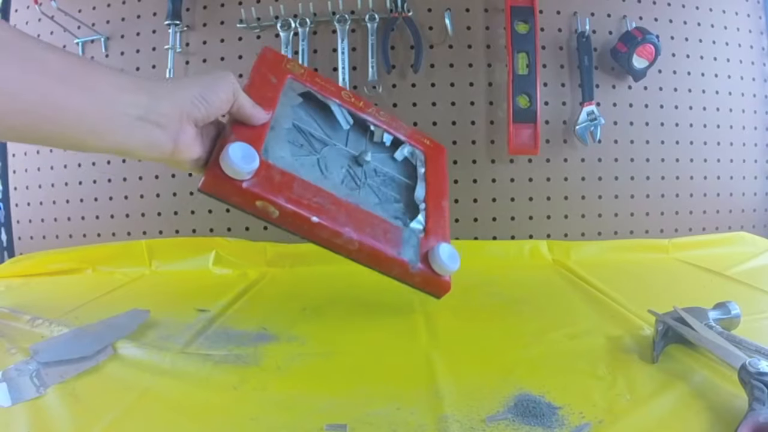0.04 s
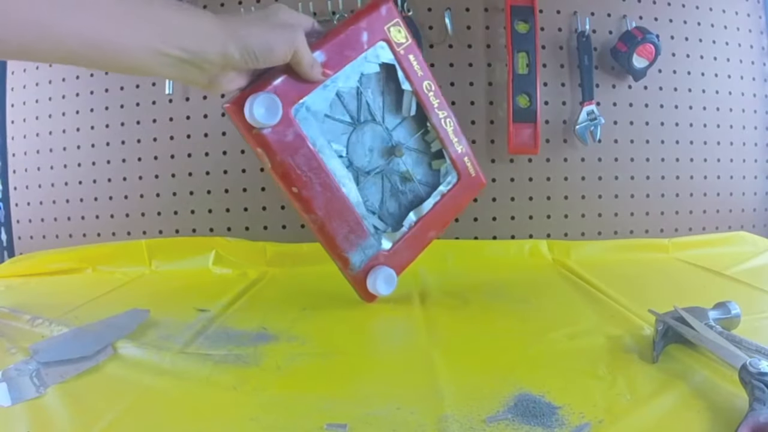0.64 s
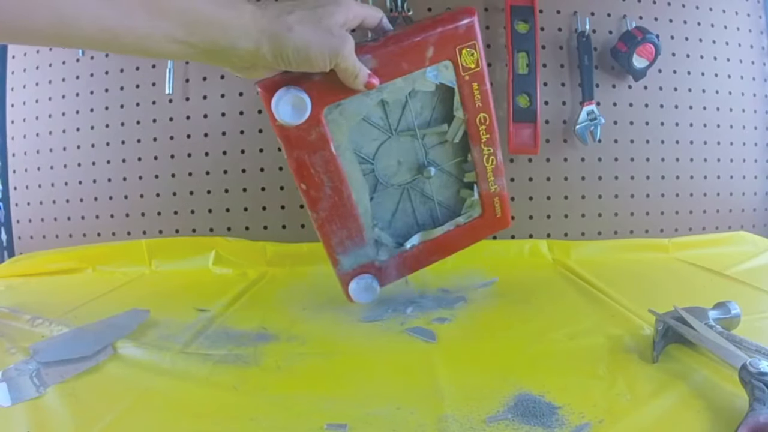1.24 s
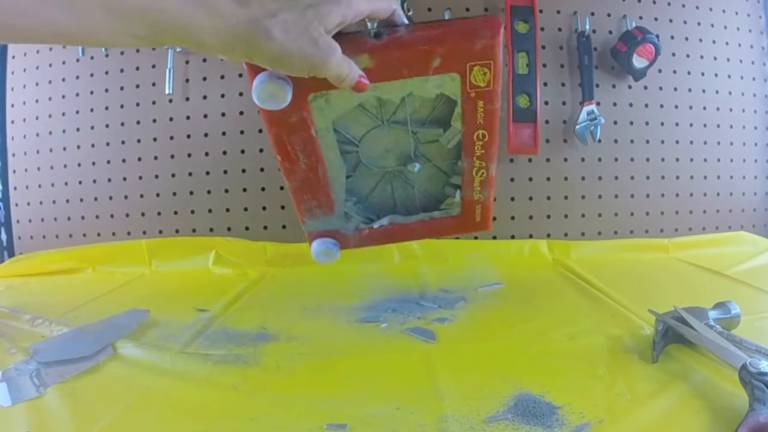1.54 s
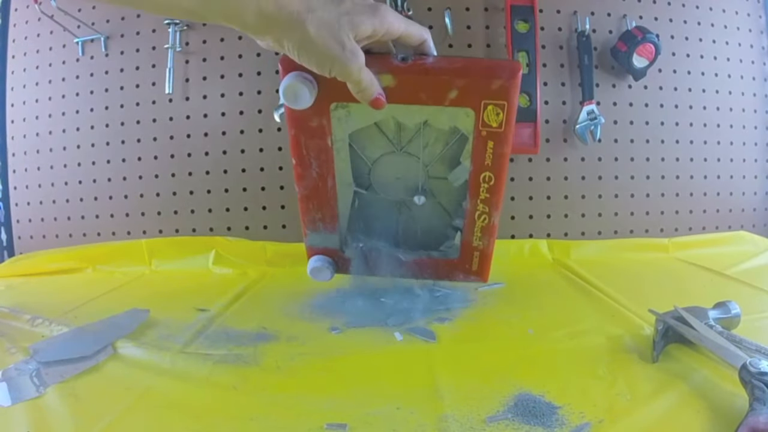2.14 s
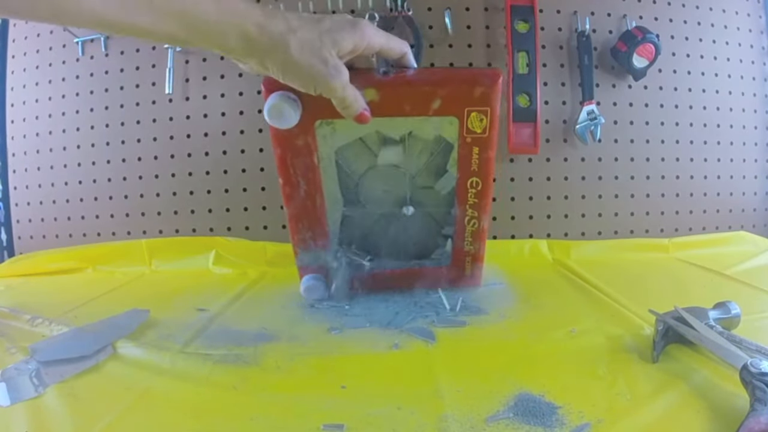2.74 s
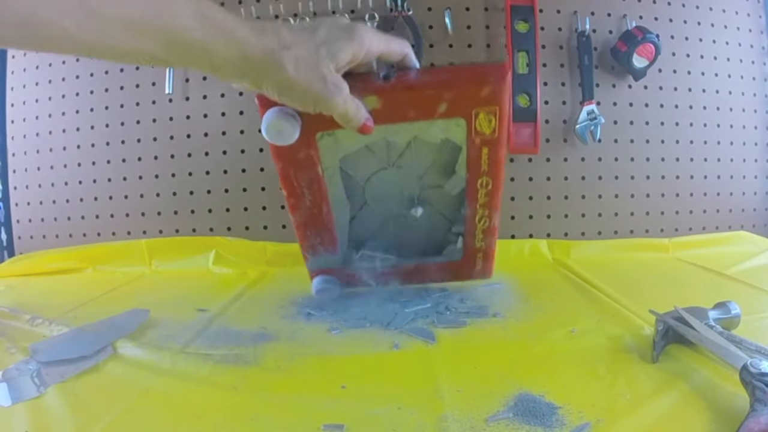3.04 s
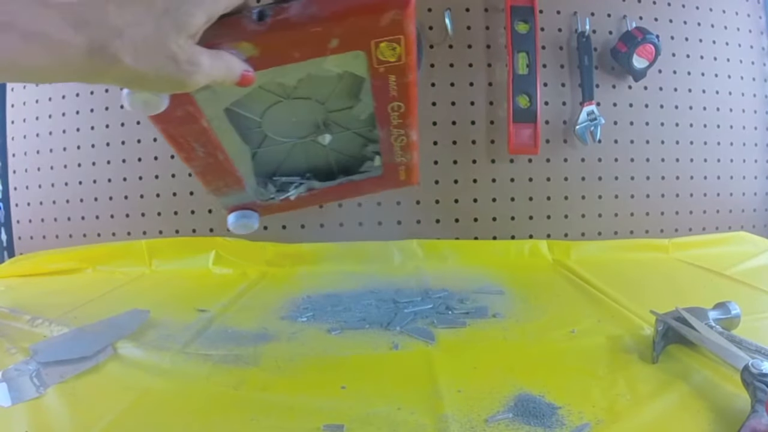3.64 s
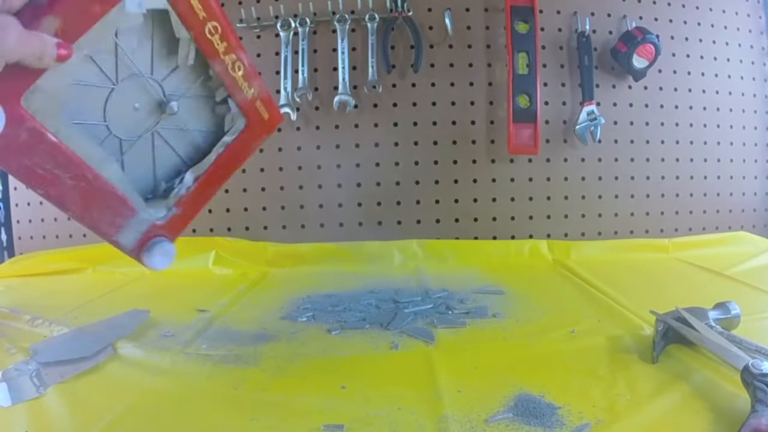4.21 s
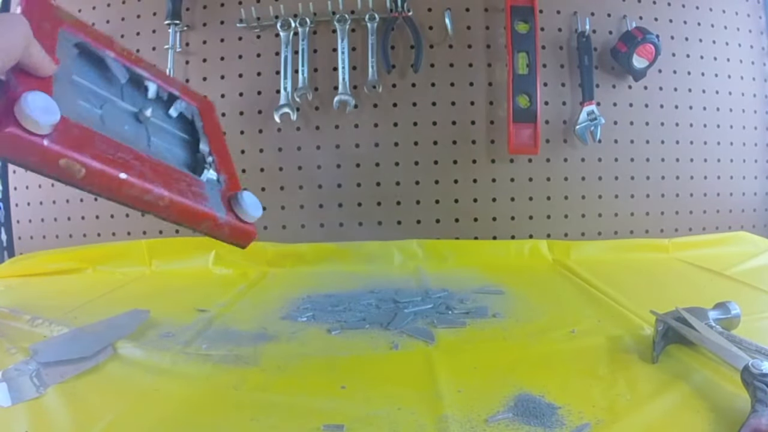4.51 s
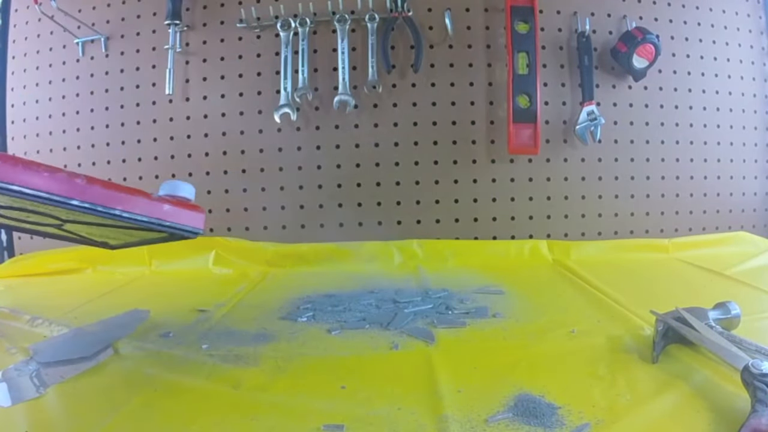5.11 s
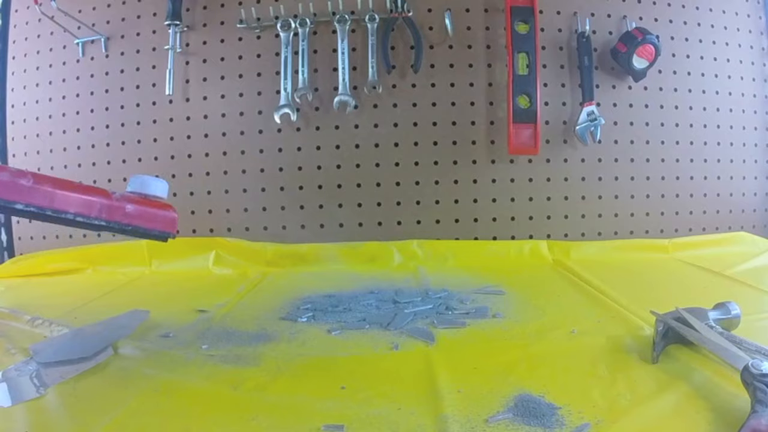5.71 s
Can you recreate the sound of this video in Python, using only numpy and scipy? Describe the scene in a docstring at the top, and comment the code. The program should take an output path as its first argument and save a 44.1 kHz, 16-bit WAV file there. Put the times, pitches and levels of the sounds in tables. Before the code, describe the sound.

Close by in a small, softly humming workshop, a hollow plastic toy thumps against a table, its broken glass rattling inside. Shards and powder spill out in two hissing, clinking pours, with small squeaks of glass edges and a knock starting the second. Two more sharp knocks follow, then things quieten to a faint trickle of grit and a few plastic creaks.

```python
"""Emptying a broken drawing toy

A plastic drawing toy with a smashed glass screen is knocked on a covered work table to empty it.
Each impact excites the modes of table and case. Shards clink by collision, squeak by friction and
slide out in a granular hiss of grit and powder. Stick-slip makes the case creak as it is carried off.
A wall close behind reflects everything in a small, humming workshop."""
import sys
import numpy as np
from scipy import signal
from scipy.fft import rfft, irfft
from scipy.io import wavfile
from scipy.ndimage import uniform_filter1d, map_coordinates

SR = 44100
rng = np.random.default_rng(int(sys.argv[2]) if len(sys.argv) > 2 else 0)


def digitize_waveform(pressure):
    """Quantize a signal to 16-bit integers and store it at the path in sys.argv[1].

    Rows of a 2-D input are taken as channels; values are limited to [-1, 1].
    """
    field = np.atleast_2d(pressure).T
    bounded = np.clip(field, -1, 1)
    quanta = np.round(bounded * 32767).astype(np.int16)
    wavfile.write(sys.argv[1], SR, quanta)


N = 258667
T = np.arange(N) / SR
FREQS = np.fft.rfftfreq(N, 1 / SR)


def undb(db):
    """Amplitude grows tenfold every 20 dB."""
    return 10 ** (np.asarray(db) / 20)


def unit(x):
    """Normalisation to an energy of one."""
    return x / np.sqrt(np.sum(x ** 2) + 1e-18)


def on_log(hz, points):
    """Interpolation of (Hz, value) points along a logarithmic frequency axis."""
    f, value = np.transpose(points)
    return np.interp(np.log(np.maximum(hz, 1)), np.log(f), value)


def colour(points, size=2048):
    """A (Hz, dB) spectrum determines its minimum-phase impulse response."""
    cepstrum = irfft(np.log(undb(on_log(np.fft.rfftfreq(size, 1 / SR), points))))
    cepstrum[1:size // 2] *= 2
    cepstrum[size // 2 + 1:] = 0
    return irfft(np.exp(rfft(cepstrum)))


def through(x, response):
    """A linear system convolves its input with its impulse response."""
    return signal.fftconvolve(x, response)[:len(x)]


def highpass(x, hz):
    """A body radiates poorly at wavelengths much longer than itself."""
    return signal.sosfilt(signal.butter(2, hz, "high", fs=SR, output="sos"), x)


def add(out, start, x):
    """Superposition: x joins out from a start in seconds."""
    i = max(int(start * SR), 0)
    out[i:i + len(x)] += x[:max(N - i, 0)]


def ring(modes, t):
    """Free vibration is a sum of damped (Hz, dB, T60) modes, here of alternating sign."""
    return sum((-1) ** k * undb(db) * np.sin(2 * np.pi * hz * t) * np.exp(-np.log(1000) * t / t60)
               for k, (hz, db, t60) in enumerate(modes))


def shaped_noise(spectrum):
    """Filtered white noise takes on the filter's spectrum; its rms is set to one."""
    return unit(irfft(rfft(rng.standard_normal(N)) * spectrum, N)) * np.sqrt(N)


def wander(seconds):
    """Low-passed noise fluctuates slowly, over the given time scale."""
    return shaped_noise(np.exp(-(FREQS * seconds) ** 2))


# Each row: frequency in Hz, relative level of the room noise in dB.
AIR_SPECTRUM = [(25, -13.5), (50, -7), (100, -13.5), (140, -26.5), (200, -21.5), (330, -23), (410, -29.5),
                (500, -24), (850, -26.5), (2000, -33.5), (5000, -43.5), (16000, -79)]
# Each row: centre of a hum band in Hz, half-width in Hz, rms level in dB.
HUM_BANDS = [(144.2, 23, -48.5), (285, 37, -61.5), (413, 22, -67)]
def room_hum(air_db=-54):
    """Narrow bands of noise are heard as a wavering hum, over soft broadband room noise."""
    air = through(rng.standard_normal(N), unit(colour(AIR_SPECTRUM)))
    hum = sum(undb(db) * shaped_noise(1 / (1 + ((FREQS - hz) / width) ** 2))
              for hz, width, db in HUM_BANDS)
    return undb(air_db) * air + hum


def grains(n, rate, spread_db):
    """Shot noise: random impacts at a rate per second, a few far above the rest; rms near one."""
    chance = rng.random(n)
    excess = np.minimum(rng.exponential(size=n), np.pi)
    sign = rng.choice([-1, 1], n)
    size = undb(spread_db * excess)
    return (chance < rate / SR) * sign * size / np.sqrt(np.mean(size ** 2) * rate / SR)


# Debris pours from the upturned case. Each row: crest in seconds, flow in dB, swell in dB per second,
# time it starts to run dry in seconds, powder in dB relative to the flow.
DEBRIS_POURS = [(1.14, -34, 51, 1.502, -8), (2.19, -32, 96, 2.524, -6.5)]
# Debris shifts in the tilted case. Each row: middle in seconds, flow in dB, half-length in seconds,
# powder in dB relative to the flow.
DEBRIS_SHIFTS = [(0.25, -47, .13, -8), (0.694, -52, 0.52, -13), (1.653, -58, 0.47, -6),
                 (2.021, -45.5, 0.025, -17), (2.694, -59, 0.25, -3.5), (3.111, -49, .13, -7),
                 (3.42, -56, 0.11, -9), (3.922, -60.5, 0.088, -2), (4.147, -57, 0.087, 0.5),
                 (4.69, -57, 0.42, -5), (5.285, -62.5, 0.31, -22)]
def flow(trickle_db=-67.5, thinning_db_per_s=21.5, drying_db_per_s=200, powder_lag_s=0.019):
    """Incoherent sources add in power: trickle, pours and shifts give grit and powder levels in dB."""
    grit, powder = undb(trickle_db) ** 2, undb(trickle_db - 8) ** 2
    for crest, db, swell, runs_dry, powder_db in DEBRIS_POURS:
        pour = undb(db - swell * np.maximum(crest - T, 0)
                    - thinning_db_per_s * np.maximum(T - crest, 0)
                    - drying_db_per_s * np.maximum(T - runs_dry, 0))
        grit += pour ** 2
        powder += (undb(powder_db) * np.interp(T - powder_lag_s, T, pour)) ** 2
    for middle, db, half_length, powder_db in DEBRIS_SHIFTS:
        shift = undb(db) * np.exp(-((T - middle) / half_length) ** 2)
        grit += shift ** 2
        powder += (undb(powder_db) * shift) ** 2
    return 10 * np.log10(grit), 10 * np.log10(powder)


# Spectra of sliding grit and powder. Each row: frequency in Hz, relative level in dB.
GRIT_SPECTRUM = [(200, 5), (650, 3.5), (1100, 5), (1900, 3.5), (3000, 2), (4800, 1.5), (6300, 0),
                 (8000, -9), (16000, -20)]
POWDER_SPECTRUM = [(2000, -37), (6000, -25), (8000, 2.5), (10000, 1.5), (12000, -3.5), (16000, -2.5)]
def debris():
    """Granular flow: a strong stream tumbles as separate grains, a weak one blurs into a hiss."""
    flow_db, powder_db = flow()
    graininess = np.interp(flow_db, [-60, -45], [.45, .92])
    tumble = graininess * grains(N, rate=1100 * undb(.3 * (flow_db + 35)), spread_db=5.5)
    hiss_share = np.sqrt(1 - graininess ** 2)
    grit, powder = (through(tumble + hiss_share * rng.standard_normal(N), unit(colour(spectrum)))
                    for spectrum in (GRIT_SPECTRUM, POWDER_SPECTRUM))
    surge = undb(2.5 * wander(seconds=0.023))  # the stream sticks and slips
    return surge * (undb(flow_db - 1) * grit + undb(powder_db - 2) * powder)


def slot(x, resonance_hz=1120, drift=.13, reflection=0.29):
    """Comb filtering: reflections in the exit gap give resonances that glide as the case tilts."""
    lag = SR / resonance_hz * np.exp(drift * wander(seconds=.06))
    passes = sum(reflection ** k * map_coordinates(x, [np.arange(N) - k * lag], order=3)
                 for k in range(3))
    return passes / np.hypot(1, reflection)


def landing(t, rise_s, rate=20000):
    """Multiple contact: a jagged edge beds into the pile in a quick swell of tiny impacts."""
    return unit(grains(len(t), rate, spread_db=9.2) * t * np.exp(-t / rise_s))


def shard(t, t60=0.0088, count=22):
    """An irregular glass plate has scattered, inharmonic modes, damped by the pile."""
    pitch, size, life = rng.random((count, 3)).T
    hz = 1700 * np.minimum(8.5 ** pitch, 11)
    return unit(ring(zip(hz, -10 * size, t60 * (.5 + life)), t))


def stray_shards(per_second=18):
    """Random collisions: small shards tick with a strength that follows the flow carrying them."""
    out, t, flow_db = np.zeros(N), T[:SR // 20], flow()[0]
    for place, size in rng.random((int(per_second * T[-1]), 2)):
        i = int(place * N)
        contacts = landing(t, rise_s=0.0015, rate=4000)
        tick = unit(contacts + 0.25 * through(contacts, shard(t)))
        add(out, T[i], undb(flow_db[i] + 14.5 + 10 * size) * tick)
    return through(out, unit(colour([(500, -19), (2000, -10), (5200, -4), (8000, 4), (15000, -12.5)])))


def chatter(t, decay_s, rate):
    """Dissipation: a run of tiny contacts dies away exponentially."""
    return unit(grains(len(t), rate, spread_db=2.4) * np.exp(-t / decay_s))


def contact_pulse(u):
    """A struck table top radiates the rate of change of force; u is time over contact time."""
    return -u / (1 + (u / 2) ** 2) ** 3


# Modes of the table top, the plastic case and the room's low ring.
# Each row: frequency in Hz, relative level in dB, time to decay by 60 dB (T60) in seconds.
TABLE_RESONANCES = [(155.4, 1, 0.18), (178, 9, 0.066), (214, -1, 0.18), (255, -4, 0.18), (347, -1.5, 0.18),
                    (393, -4, 0.13), (562, -8, 0.16), (574, -28.5, .1), (645, -11.5, 0.2), (759, -11, 0.15),
                    (940, -31, 0.11), (1088, -13.5, 0.15), (1320, -8.5, 0.073)]
CASE_RESONANCES = [(245, -4.5, 0.25), (512, -0.5, 0.059), (589, 6.5, 0.029), (704.5, 0, 0.083),
                   (826, -8.5, 0.077), (996, -18, 0.046), (1223, -8, 0.058)]
ROOM_RESONANCES = [(149.6, 2, 0.37), (449, -2.5, 0.24)]
# Each row: frequency in Hz, gain on crack and rattle in dB.
CRACK_SPECTRUM = [(300, 20.5), (900, 7.5), (1800, 7), (3500, 3.5), (5000, 1), (7500, -6), (11000, -9.5),
                  (16000, -18)]
# The case strikes the table. Each row: start in seconds, thump gain in dB, contact time in ms,
# rebound interval in ms, then gains in dB for case ring, crack, crack treble and rattle.
CASE_KNOCKS = [(0.0512, -15.5, 0.66, 5.7, -17, -7, -5.5, -30), (0.3608, -7, 0.63, 5.6, -5, 4.5, -6.5, -4.5),
               (0.5558, -8, 0.66, 4.5, -6, 2.5, -4.5, -11), (2.0983, -10.5, 0.42, 3.4, 4, -4, -1.5, -7.5),
               (2.9271, -8, 0.7, 6.7, -20, 8.5, 2.5, -9), (3.3217, -8.5, 0.85, 4.2, -15, 2, -1, -9)]
def knocks(restitution=0.54, detune=0.0092, hollow_hz=270.4, sag=0.3475, sag_s=0.0806):
    """Impact excites modes: the table thumps, the rebounding case rings and cracks, glass rattles."""
    out, t, lead_s = np.zeros(N), T[:SR // 2], .004
    case = unit(ring(CASE_RESONANCES, t) * (1 - np.exp(-t / 0.00014)))
    standing_waves = unit(ring(ROOM_RESONANCES, t) * (1 - np.exp(-t / 0.0086)))
    # a lingering hollow note starts sharp and sinks to its pitch
    sagging_time = t + sag * sag_s * (1 - np.exp(-t / sag_s))
    hollow = unit(ring([(hollow_hz, 0, 0.66)], sagging_time) * (1 - np.exp(-t / 0.021)))
    for start, thump_db, contact_ms, rebound_ms, case_db, crack_db, treble_db, rattle_db in CASE_KNOCKS:
        u = (t - lead_s) * 1000 / contact_ms
        slap = sum(restitution ** k * contact_pulse(u - k * rebound_ms / contact_ms) for k in range(4))
        add(out, start - lead_s, undb(thump_db) * 2.78 * slap)
        # each blow falls on another spot and loads the table differently
        chance = rng.uniform(-0.57, 1, (len(TABLE_RESONANCES), 2))
        modes = [(hz * (1 + detune * load), db + 2 * spot, t60)
                 for (hz, db, t60), (load, spot) in zip(TABLE_RESONANCES, chance)]
        thump = unit(ring(modes, t)) - 0.25 * standing_waves + 0.33 * hollow
        add(out, start, undb(thump_db) * 9.2 * thump + undb(case_db) * 4.4 * case)
        snap = landing(t, rise_s=0.00019) + 1.33 * chatter(t, decay_s=0.012, rate=5000)
        crack = undb(crack_db) * unit(snap + 0.079 * shard(t))
        add(crack, rebound_ms / 1000, undb(crack_db - 2.5) * landing(t[:SR // 50], rise_s=.0004))
        crack = highpass(through(crack, colour([(1500, 0), (4500, treble_db)])), hz=714)
        splinters = grains(len(t), rate=1200, spread_db=5) * t * np.exp(-t / 0.045)
        rattle = undb(rattle_db) * unit(highpass(splinters, hz=1580))
        add(out, start - .0005, through(crack + rattle, colour(CRACK_SPECTRUM)))
    return highpass(out, hz=50)


# Each row: middle in seconds, pitch in Hz, level in dB, length in seconds.
EDGE_SQUEAKS = [(0.122, 7540, -43, 0.021), (0.174, 7510, -39, 0.024), (0.19, 1120, -38.5, 0.069),
                (0.285, 7560, -39, 0.0093), (0.317, 1136, -34.5, 0.0082), (0.765, 7680, -45, 0.0075),
                (0.872, 1131, -38, 0.031), (1.02, 1120, -38, 0.17), (1.294, 11200, -44, .032),
                (2.245, 6030, -22.5, 0.011), (2.403, 8920, -32, .033), (2.549, 9420, -42.5, 0.048),
                (3.405, 4350, -42.5, 0.015), (3.408, 6540, -45, 0.016), (3.761, 6010, -53, 0.033),
                (4.996, 1640, -40.5, 0.0051), (5.053, 1677, -41, 0.0097)]
def squeaks(overtone_db=-6, bend_hz=90.1, waver_hz=102):
    """Stick-slip friction: glass and plastic edges sing; pressure bends the pitch, slips shake it."""
    out, t = np.zeros(N), T[:SR // 3]
    centre = t[-1] / 2
    for middle, hz, db, length in EDGE_SQUEAKS:
        wobble, grip = uniform_filter1d(rng.standard_normal((2, len(t))), size=64)
        bend = np.interp(t, np.linspace(0, t[-1], num=12), rng.standard_normal(12))
        phase = 2 * np.pi * np.cumsum(hz + bend_hz * bend + waver_hz * wobble / wobble.std()) / SR
        tone = sum(undb(overtone_db * (k - 1)) * np.sin(k * phase)
                   for k in range(1, 5) if k == 1 or k * hz < 6000)
        swell = np.exp(-2 * ((t - centre) / length) ** 2) * (1 + 0.41 * grip / grip.std())
        add(out, middle - centre, undb(db) * tone * swell)
    return out


# Each row: frequency in Hz, gain on every clink in dB.
CLINK_SPECTRUM = [(100, 25.5), (300, 20), (900, 9), (1800, 7), (3200, 4.5), (4800, 6.5), (6200, 2),
                  (7500, -2.5), (11000, -9.5), (16000, -18)]
# Shards strike each other, the case and the table; the row at 2.0968 s is instead the bright crack # of the
# case knock at 2.0983 s, and the row at 1.2135 s doubles the clink just before it. # Each row: landing time in
# seconds, then relative level, body and brightness in dB.
SHARD_CLINKS = [(0.172, -20.5, -13, -15), (0.2118, -19.5, -18, -19), (0.3366, -29.5, -6, -6),
                (0.4086, -23, -6, -7.5), (0.637, -30, -6, -18), (0.7568, -30.5, -6, -14),
                (0.846, -26.5, -13, -9), (0.8594, -18.5, -14.5, -14), (0.9528, -21.5, -24, -5),
                (0.9952, -21, -34, -5), (1.029, -17, -38, -5), (1.067, -14, -22, -13),
                (1.08, -14.5, -30, -10), (1.1194, -14, -22, -8.5), (1.1436, -9, -5, -23),
                (1.2087, -8.5, -17, -19), (1.2135, -14, -11.5, -13), (1.2302, -12, -16, -8),
                (1.3328, -20, -7, -9), (1.346, -11.5, -10, -21), (1.425, -21, -6, -5),
                (1.5108, -17.5, -19.5, -13.5), (1.5605, -27, -14, -19), (1.7956, -24.5, -27, -10.5),
                (2.0968, -13.5, -6, -5), (2.1552, -21, -4.5, -5), (2.1926, -7.5, -22, -8),
                (2.2562, -12, -21.5, -9.5), (2.3158, -13.5, -13.5, -38), (2.3395, -15.5, -16.5, -10),
                (2.351, -14, -13.5, -11), (2.397, -16, -11, -10), (2.462, -21.5, -10, -16),
                (2.5151, -21, -10.5, -8.5), (3.1324, -23.5, -6, -19), (3.189, -32, -7, -7),
                (3.5474, -32.5, -8.5, -25), (4.1374, -29.5, -20, -11)]
def clinks(ring_share=0.13):
    """Collision: a shard lands, rings and chatters to rest; heavy ones sound the table too."""
    out, t, lead = np.zeros(N), T[:SR // 8], SR // 40
    for lands, db, body_db, bright_db in SHARD_CLINKS:
        contacts = unit(landing(t, rise_s=0.00076) + landing(t, rise_s=0.0048, rate=2800))
        contacts[SR // 1000] += 0.16  # the corner snaps down
        # a faint, brief swell of ticks just before each clink
        lead_in = 0.16 * chatter(t[:lead], decay_s=0.0023, rate=8300)[::-1]
        contacts = np.concatenate([lead_in, contacts])
        hit = unit(contacts + ring_share * through(contacts, shard(t)))
        bass_db, treble_db = min(body_db + 5, 0), min(bright_db, -5) + 14.5
        hit = through(hit, colour([(600, bass_db), (1800, 0), (6000, 0.0056), (10000, treble_db)]))
        add(out, lands - lead / SR, undb(db + 15.5) * through(hit, colour(CLINK_SPECTRUM)))
    return highpass(out, hz=218)


# Each row: frequency in Hz, relative level of the creaking plastic in dB.
CREAK_SPECTRUM = [(200, -30), (520, -6), (780, 8.5), (1200, -4), (1620, 4), (1850, 6), (2500, -0.5),
                  (3300, -1), (5000, -5.5), (8000, -12), (16000, -27)]
# Each row: start in seconds, level in dB, decay time in seconds, treble gain in dB.
CASE_CREAKS = [(4.644, -17, 0.057, -8), (4.681, -13, 0.0093, 9), (4.697, -9, 0.012, 3),
               (4.799, -5, 0.0027, -4.5), (4.991, -14, 0.0028, -6), (5.021, -12.5, 0.0021, 7.5),
               (5.046, -14.5, 0.0051, 1), (5.27, -19, 0.054, -2), (5.325, -20.5, 0.008, -10)]
def creaks():
    """Stick-slip excitation: runs of ticks drive the resonances of the hollow case in the hand."""
    out, t = np.zeros(N), T[:SR // 4]
    plastic = unit(colour(CREAK_SPECTRUM))
    hollow = unit(ring([(750, 4, 0.095), (840, -22, 0.031), (1640, 7, 0.031),
                        (2005, 12.5, 0.018), (2620, 3, 0.034)], t))
    for start, db, decay_s, treble_db in CASE_CREAKS:
        slips = unit(chatter(t, decay_s, rate=3500) * (1 - np.exp(-t / 0.00042)))
        slips = through(slips, colour([(3500, 0), (9000, treble_db)]))
        add(out, start, undb(db) * (through(slips, plastic) + .5 * through(slips, hollow)))
    return out


# Each row: frequency in Hz, reverberation time (T60) in seconds.
REVERB_TIMES = [(125, 0.43), (400, 0.47), (1500, 0.17), (5000, 0.079), (14000, 0.095)]
def room_tail(level_db=-5, bass_db=-17):
    """Reverberation: a diffuse field decays exponentially in each band, the treble before the bass."""
    t, edges = T[:SR // 2], np.geomspace(60, 18000, num=9)
    f, noise = np.fft.rfftfreq(len(t), 1 / SR), rfft(rng.standard_normal(len(t)))
    noise *= undb(on_log(f, [(350, bass_db), (1000, 0.003)]))  # a small room's bass is hardly diffuse
    tail = np.zeros(len(t))
    for low, high in zip(edges, edges[1:]):
        band = irfft(noise * ((f >= low) & (f < high)), len(t))
        t60 = on_log(np.sqrt(low * high), REVERB_TIMES)
        tail += band * np.exp(-np.log(1000) * t / t60)
    return undb(level_db) * unit(tail * (1 - np.exp(-t / 0.004)))


def workshop(x, echo_s=.007):
    """Reflection: the near wall returns one strong echo; the tail changes as the case moves about."""
    early = np.zeros(SR // 8)
    early[0] = 1
    wall = colour([(150, -14.5), (800, -2), (6000, -9), (16000, -17)])  # bass passes the thin board
    add(early, echo_s, undb(-2) * wall)
    turn = 2 * np.pi * T  # two tails trade places in a one-second cycle
    tails = through(x * np.cos(turn), room_tail()) + through(x * np.sin(turn), room_tail())
    return through(x, early) + tails


def scene():
    """Superposition: the toy's sounds, their reflections and the room's hum add in one channel."""
    toy = knocks() + clinks() + stray_shards() + squeaks() + slot(debris()) + creaks()
    return (workshop(toy) + room_hum())[None]


# Each row: middle of a dip in seconds, length in seconds.
LEVEL_DIPS = [(3.721, 0.028), (3.985, 0.042), (4.514, 0.03)]
def record(dry, dip_db=-20, cutoff_hz=16200):
    """The level dips briefly three times; saturation rounds the peaks and a low-pass cuts the top."""
    dips = sum(np.exp(-(2 * (T - middle) / length) ** 4) for middle, length in LEVEL_DIPS)
    rounded = 2 * np.tanh(dry * undb(dip_db * dips) / 2)
    return signal.sosfilt(signal.ellip(10, .2, 80, cutoff_hz, fs=SR, output="sos"), rounded)


dry = scene()
out = record(dry)
digitize_waveform(out)
```